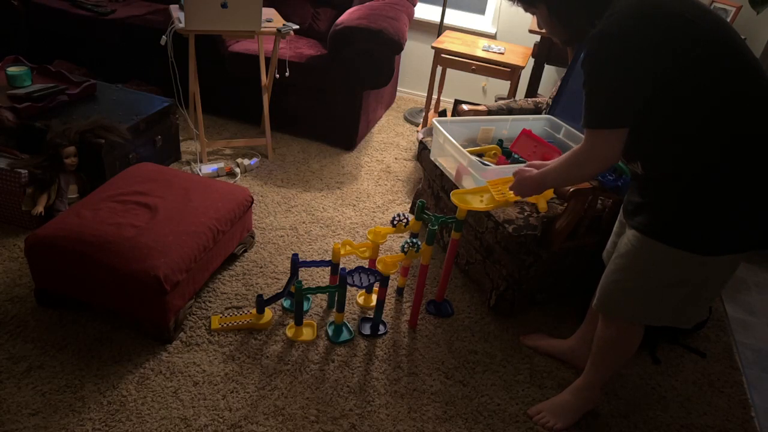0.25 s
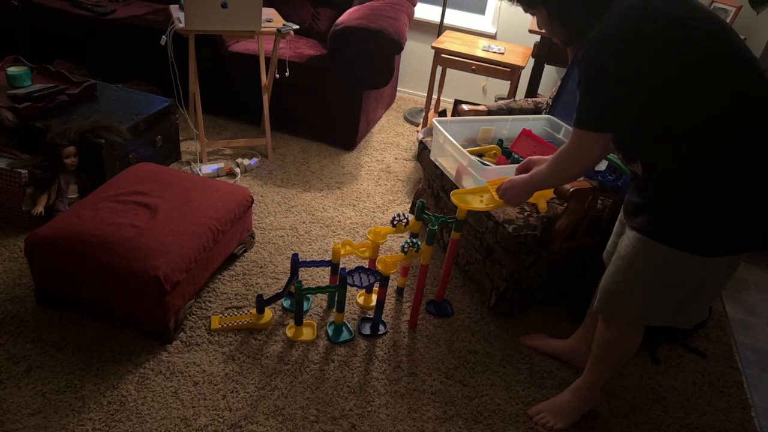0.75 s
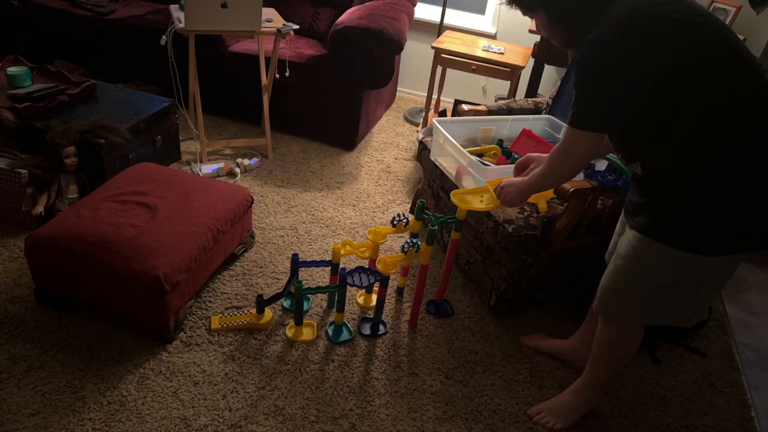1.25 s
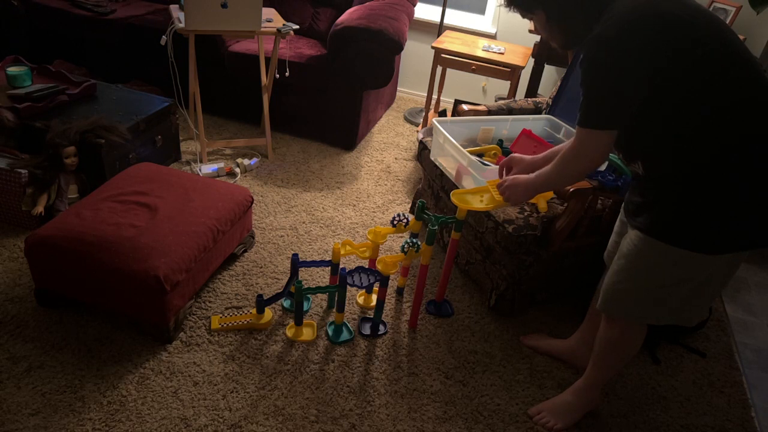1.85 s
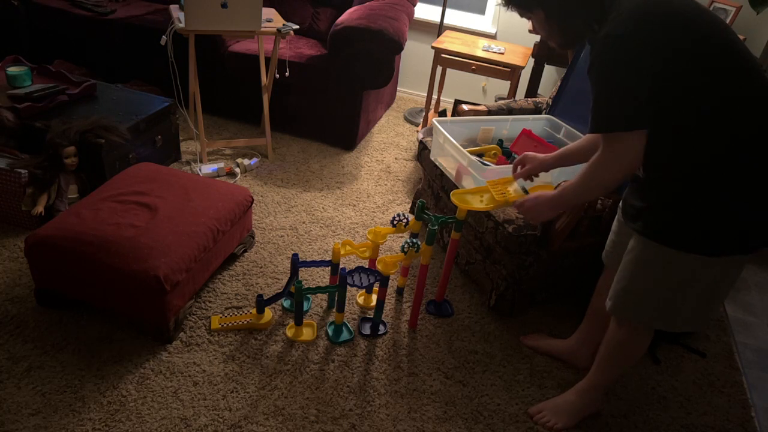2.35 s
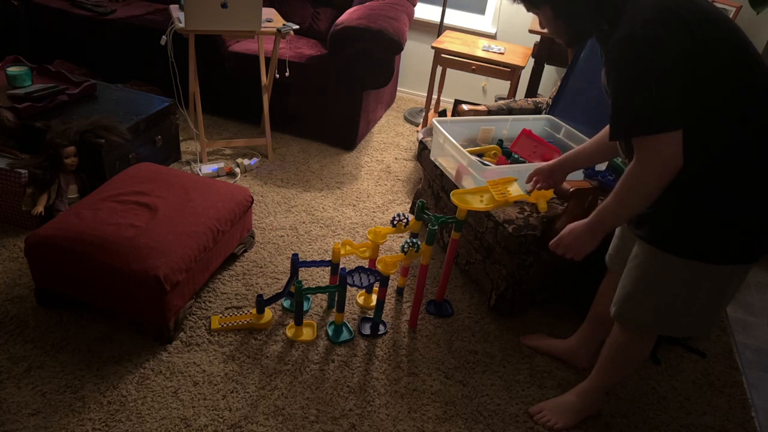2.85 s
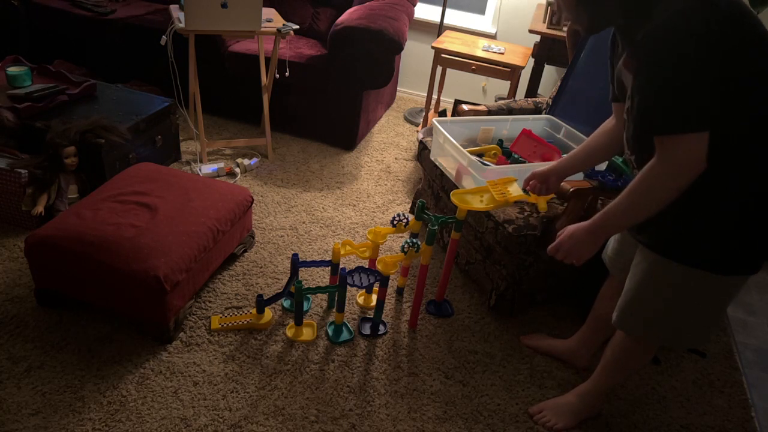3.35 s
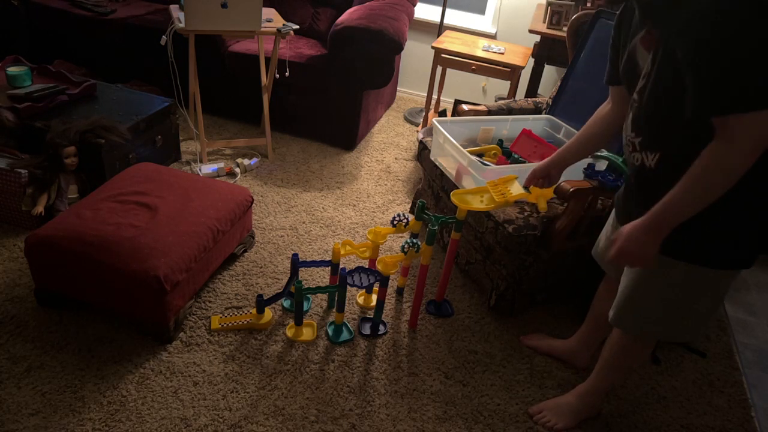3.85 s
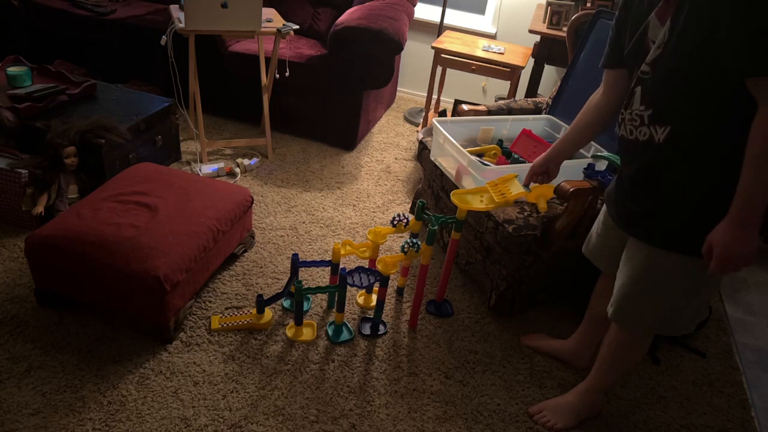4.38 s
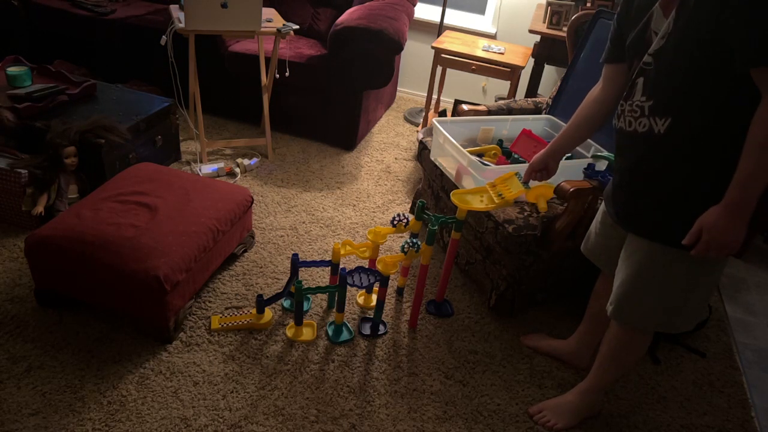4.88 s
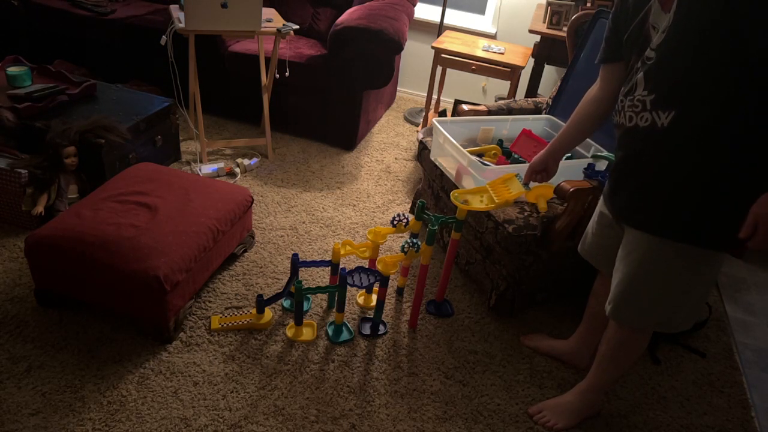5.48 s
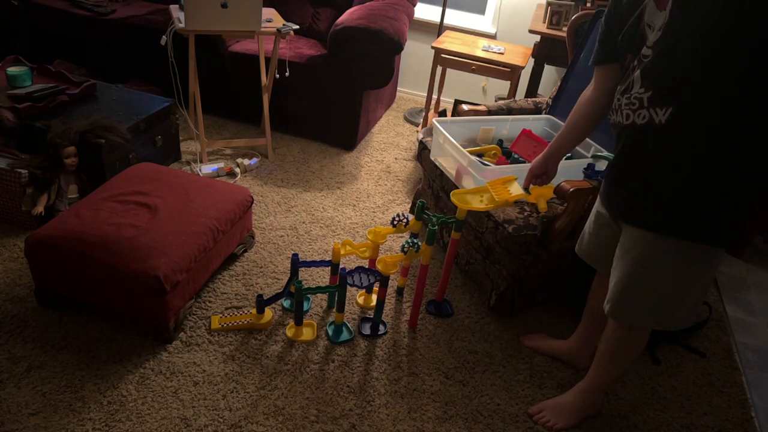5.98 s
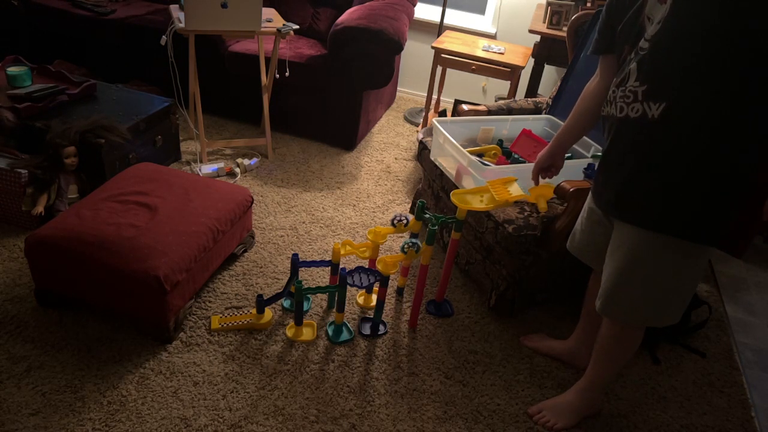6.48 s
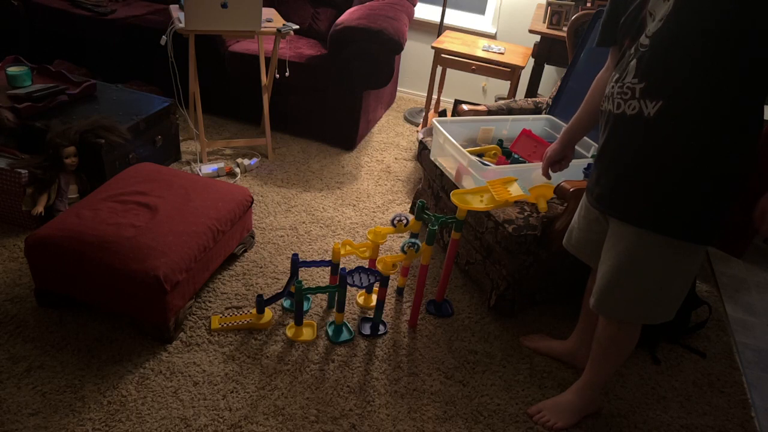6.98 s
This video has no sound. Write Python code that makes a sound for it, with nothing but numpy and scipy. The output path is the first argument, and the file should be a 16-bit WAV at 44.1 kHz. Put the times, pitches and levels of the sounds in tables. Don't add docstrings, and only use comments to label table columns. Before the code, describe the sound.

A quiet carpeted living room with low, wavering appliance hum and faint hiss, heard from a few metres away. From 0 to 0.3 s glass marbles stir softly in a plastic tray; after a pause, small clicks return from 0.9 to 1.5 s. At about 1.7 s one marble starts down the toy track, ticking from piece to piece, with stronger knocks near 2.1, 2.2 and 2.5 s and spaced hits until 3.3 s. From 3.4 s it bounces in quick, fading taps, resting by 4.3 s. A very faint, very high squeak wavers at 4.6-5.0 s. At 5.2 s a handful is released with a loud thump and pours down in a dense, bright, hollow plastic clatter, busiest until 6.1 s. It thins into clumps and stragglers, with ringing cup hits near 6.45 s and a sharp one at 7.13 s. Short room echoes follow every knock.

```python
import sys
import numpy as np
from scipy import signal
from scipy.fft import rfft, irfft
from scipy.io import wavfile
from scipy.ndimage import uniform_filter1d

SR = 44100
rng = np.random.default_rng(int(sys.argv[2]) if len(sys.argv) > 2 else 0)


def unload_audio(sound):
    columns = np.transpose(np.atleast_2d(sound))
    steps = np.round(np.clip(columns, -1, 1) * 32767)
    wavfile.write(sys.argv[1], SR, steps.astype(np.int16))


def voltage_ratio(decibels):
    exponent = np.asarray(decibels, float) / 20
    return 10 ** exponent


N = 318843

TRAY_HZ, TUBE_HZ, CHUTE_HZ, RAMP_HZ, RAIL_HZ = 305, 688, 1387, 1730, 1980
STEP_HZ, WALL_HZ, GATE_HZ, CUP_HZ, TIPPED_CUP_HZ = 2190, 2345, 3130, 4075, 4160
# pitch in Hz, width in Hz, level in dB.
TUBE_MODES = [(693.7, 8.9, -11.5), (840, 120, -10), (982, 58, -0.5)]
# pitch in Hz, width in Hz, level in dB.
UPPER_WALLS = [(1390, 340, -8), (2006, 51, 5), (2340, 44, 10), (2663, 100, 12.5), (3030, 42, 8.5),
               (3400, 14, -31), (4080, 78, 4.5), (4120, 110, -36), (4520, 73, -29)]
# frequency in Hz, level in dB per Hz.
UPPER_BODY = [(600, -37.5), (1050, -7), (1400, -5), (2330, -8), (3490, -5.5), (4150, -7), (5200, -21.5),
              (6760, -47)]
# frequency in Hz, level in dB per Hz.
LOWER_CHUTE_BODY = [(600, -40.5), (1000, -1), (1400, -1), (1800, -1.5), (2400, -3), (3100, -9), (4300, -21),
                    (5200, -46), (6760, -37)]
# frequency in Hz, level in dB per Hz.
CRACK = [(3000, -40), (4800, -5), (6300, -0.5), (8000, -2.5), (10000, -7.5), (11500, -9), (13200, -17.5),
         (14800, -11.5), (16500, -8.5), (19000, -35)]
STAGE_SETTINGS = {"stirs": (0.062, -13, 0.0066), "drops": (0.047, -10, 0.0061),
                  "glances": (0.75, -10, 0.0086), "pour": (0.068, -8, 0.0067),
                  "rattle": (0.14, -11, 0.0052), "piles": (2.9, -11, 0.01)}


def evened(x):
    return x / np.sqrt(np.mean(x ** 2) + 1e-20)


def read(points, hz):
    f, value = np.transpose(points)
    return np.interp(np.log(hz + 1), np.log(f + 1), value)


def add(mix, start_s, sound):
    part = mix[round(start_s * SR):][:len(sound)]
    part += sound[:len(part)]


def coloured(x, points):
    hz = abs(np.fft.fftfreq(2048, 1 / SR))
    log_gain = np.log(voltage_ratio(np.maximum(read(points, hz), -70)))
    taps = np.fft.ifft(np.exp(np.conj(signal.hilbert(log_gain)))).real[:1024]
    return signal.oaconvolve(x, taps / np.linalg.norm(taps))[:len(x)]


def ring(x, hz, width_hz):
    radius = np.exp(-np.pi * width_hz / SR)
    angle = 2 * np.pi * hz / SR
    poles = [1, -2 * radius * np.cos(angle), radius * radius]
    return np.sqrt(1 - radius) * np.sin(angle) * signal.lfilter([0, 1], poles, x)


def swells(rows, rise_db_per_s, fall_db_per_s):
    t = np.arange(N) / SR
    levels_db = []
    for start_s, hold_s, db in rows:
        before_s = np.maximum(start_s - t, 0)
        after_s = np.maximum(t - start_s - hold_s, 0)
        levels_db.append(db - rise_db_per_s * before_s - fall_db_per_s * after_s)
    return np.max(levels_db, axis=0)


def hush():
    # frequency in Hz, level in dB per Hz.
    air_spectrum = [(20, -50), (36, -5.5), (90, -13), (140, -13.5), (175, -7), (205, -15), (260, -7),
                    (400, -14), (780, -21.5), (880, -19.5), (1100, -26), (4000, -37.5), (10200, -49.5),
                    (11800, -42), (16000, -44)]
    # pitch in Hz, wander in Hz, level in dB.
    hum_tones = [(36.4, 4.2, -86), (88.3, 1.67, -63.5), (119, 1.6, -67), (167.6, 3.82, -66),
                 (880, 4.4, -75)]
    hz = np.fft.rfftfreq(N, 1 / SR)
    air = evened(irfft(rfft(rng.standard_normal(N)) * voltage_ratio(read(air_spectrum, hz)), N))
    drifts = evened(uniform_filter1d(rng.standard_normal((len(hum_tones), N)), 6000, axis=1))
    hum = np.zeros(N)
    for (tone_hz, wander_hz, db), drift in zip(hum_tones, drifts):
        phase = 2 * np.pi * np.cumsum(tone_hz + wander_hz * drift) / SR
        hum += voltage_ratio(db + 4.0) * np.sin(phase)
    return voltage_ratio(-58) * air + hum


def room(x):
    # frequency in Hz, t60 in seconds.
    decay = [(250, 0.35), (1000, 0.47), (2800, 0.26), (7000, 0.28), (15000, 0.28)]
    t, out = np.arange(N) / SR, np.zeros(N)
    for k in range(3):
        taps = rng.standard_normal(SR // 2) * (rng.random(SR // 2) < 0.15)
        hz, when_s, z = signal.stft(taps, SR, nperseg=128)
        fade = voltage_ratio(-60 * when_s / read(decay, hz)[:, None])
        tail = signal.istft(z * fade, SR, nperseg=128)[1]
        tail *= np.clip(np.arange(len(tail)) / SR / 0.0015 - 0.4, 0, 1)
        share = np.cos(2 * np.pi * (1.3 * t + k / 3)) * np.sqrt(2 / 3)
        out += signal.fftconvolve(x * share, tail / np.linalg.norm(tail))[:N]
    return out


def squeak():
    # time in seconds, pitch in Hz.
    pitch_track = [(4.635, 11100), (4.69, 12400), (4.72, 12200), (4.755, 11750), (4.8, 12250),
                   (4.85, 11700), (4.885, 12500), (4.955, 10300), (5.0, 10100)]
    level_db, flutter_db, partial_ratio, partial_db = -78, 3.5, 1.25, -7
    s, hz = np.transpose(pitch_track)
    t, out = np.arange(s[0], s[-1], 1 / SR), np.zeros(N)
    phase = 2 * np.pi * np.cumsum(np.interp(t, s, hz)) / SR
    flutter = evened(uniform_filter1d(rng.standard_normal(len(t)), size=900))
    tone = np.sin(phase) + voltage_ratio(partial_db) * np.sin(partial_ratio * phase)
    add(out, s[0], voltage_ratio(level_db + flutter_db * flutter) * signal.windows.tukey(len(t), 0.3) * tone)
    return out


def tray_and_cup():
    # start in seconds, level in dB, pitch in Hz, t60 in seconds.
    thumps = [(1.924, -40, RAMP_HZ, 0.066), (2.09, -38, TRAY_HZ, 0.068), (2.092, -36, RAMP_HZ, .08),
              (3.297, -35, RAMP_HZ, 0.066), (4.968, -61, 2610, .06), (4.993, -60, 2610, .1),
              (5.216, -23.5, TRAY_HZ, 0.16), (5.216, -37.5, 474, 0.15), (5.23, -35, TUBE_HZ, 0.36),
              (5.224, -22.5, CHUTE_HZ, 0.21), (5.499, -31.5, CHUTE_HZ, 0.28), (5.594, -16, 2590, 0.05),
              (5.6, -46, TUBE_HZ, 0.57), (5.7, -19.5, WALL_HZ, 0.16), (5.759, -23.5, CHUTE_HZ, 0.25),
              (5.78, -35, TUBE_HZ, 0.4), (5.803, -22.5, RAIL_HZ, 0.18), (5.84, -28, RAIL_HZ, 0.31),
              (5.849, -38, CHUTE_HZ, 0.18), (5.98, -29.5, TUBE_HZ, 0.21), (6.014, -25, CHUTE_HZ, 0.077),
              (6.056, -20.5, WALL_HZ, 0.056), (7.137, -9, STEP_HZ, 0.024)]
    # start in seconds, level in dB, pitch in Hz, t60 in seconds, overtone in dB.
    cup_rings = [
        (6.406, -24, CUP_HZ, 0.04, -35),
        (6.451, -26, TIPPED_CUP_HZ, 0.26, -20),
        (6.529, -32, CUP_HZ, 0.11, -28),
        (7.142, -9, CUP_HZ, 0.025, -14),
        (7.154, -28, CUP_HZ, 0.1, -14),
    ]
    out, t = np.zeros(N), np.arange(SR // 2) / SR
    for start_s, db, hz, t60_s in thumps:
        onset = np.minimum(t * hz / 4.0, 1)
        add(out, start_s, voltage_ratio(db - 60 * t / t60_s) * np.sin(2 * np.pi * hz * t) * onset)
    for start_s, db, hz, t60_s, over_db in cup_rings:
        phase = 2 * np.pi * hz * (t - 0.134 * t ** 2)
        tone = np.sin(phase) + voltage_ratio(over_db) * np.sin(1.92 * phase)
        add(out, start_s, voltage_ratio(db + 2 - 60 * t / t60_s) * np.minimum(t / 0.00094, 1) * tone)
    return out


def jostle(body, level_db, hollow_db, crack_db, bumps_per_s):
    size_db = 6 * np.minimum(rng.exponential(1, N), 2.5)
    hits = (rng.random(N) < bumps_per_s / SR) * rng.choice([-1, 1], N)
    bumps = evened(voltage_ratio(size_db) * hits) * voltage_ratio(level_db)
    which = rng.integers(0, len(UPPER_WALLS), N)
    bump_rms = np.sqrt(np.mean(bumps ** 2))
    walls, hollow = np.zeros(N), np.zeros(N)
    for k, (hz, width_hz, db) in enumerate(UPPER_WALLS):
        walls += voltage_ratio(db) * ring(bumps * (which == k), hz, 4.8 * width_hz)
    for hz, width_hz, db in TUBE_MODES:
        hollow += voltage_ratio(db) * ring(bumps * voltage_ratio(hollow_db), hz, width_hz)
    dull = 0.7 * coloured(bumps, body)
    crack = coloured(bumps * voltage_ratio(crack_db), CRACK)
    return bump_rms * 0.94 * evened(walls) + dull + hollow + crack


def rolling():
    # start in seconds, hold in seconds, level in dB.
    surges = [
        (5.25, 0.037, -29),
        (5.5, 0.1, -23.5),
        (5.75, 0.014, -19),
        (6.0, 0.043, -19.5),
        (6.42, 0.039, -26.5),
        (6.65, 0.018, -26.5),
        (6.9, 0.038, -28.5),
        (7.2, 0.028, -25.5),
    ]
    # start in seconds, hold in seconds, level in dB.
    glides = [
        (0.0, 0.039, -33),
        (1.35, 0.27, -45),
        (2.26, 0.014, -28.5),
        (2.82, 0.21, -41),
        (3.72, 0.041, -54),
    ]
    crowd_db = swells(surges, rise_db_per_s=261, fall_db_per_s=81) - 11.5
    lone_db = swells(glides, rise_db_per_s=150, fall_db_per_s=93) - 31.5
    crowd = jostle(UPPER_BODY, crowd_db, hollow_db=-14, crack_db=-11, bumps_per_s=440)
    return crowd + jostle(LOWER_CHUTE_BODY, lone_db, hollow_db=-26, crack_db=-17, bumps_per_s=1300)


def buzz(t, rise):
    spectrum = rfft(rng.standard_normal(len(t)) * np.exp(-t) * (1 - np.exp(-t / rise)))
    return irfft(spectrum / abs(spectrum), len(t)) * np.exp(-0.4 * t)


def struck(x, modes, widen):
    out = np.zeros(len(x))
    for hz, width_hz, db in modes:
        share, detune = rng.standard_normal(2)
        out += voltage_ratio(db + 4 * share) * ring(x, hz * (1 + 0.012 * detune), width_hz * widen)
    return out


def knock(body, modes, rise, db, hz, hollow_db, crack_db, chatter_s):
    t = np.arange(4096) / SR / np.clip(chatter_s, 0.001, 0.04)
    blows = buzz(t, rise)
    walls = 0.59 * evened(struck(blows, modes, 0.82))
    piece = 0.56 * evened(ring(blows, hz, 69))
    dull = 1.14 * evened(coloured(blows, body))
    hollow = evened(struck(blows, TUBE_MODES, 1.84))
    crack = evened(coloured(blows * np.exp(-0.6 * t), CRACK))
    layers = evened(walls + piece + dull) + voltage_ratio(hollow_db - 4.0) * hollow + voltage_ratio(crack_db) * crack
    return voltage_ratio(db - 21.5) * np.sqrt(chatter_s / 0.0072) * layers


def knocks(body, modes, stage, rows):
    out = np.zeros(N)
    rise, hollow_db, chatter_s = STAGE_SETTINGS[stage]
    for start_s, db, hz, crack_db in rows:
        add(out, start_s, knock(body, modes, rise, db, hz, hollow_db, crack_db, chatter_s))
    return out


def cracked(rows):
    return [(start_s, db, hz, -12.5 + 0.62 * (db + 20)) for start_s, db, hz in rows]


def lone_marble():
    # pitch in Hz, width in Hz, level in dB.
    lower_walls = [(990, 21, -10), (1114, 14, 2), (1278, 30, 12), (1365, 16, 4), (1452, 23, 13),
                   (1590, 25, -7), (1730, 37, 15.5), (1956, 16, 13), (2177, 30, 4), (2410, 40, 3),
                   (2620, 49, 6.5), (2970, 20, 6), (3300, 26, -21), (4080, 49, -31)]
    # start in seconds, peak in dB, ring of the struck piece in Hz, crack in dB.
    stirs = [(0.0116, -48, 1680, -18), (0.0366, -40.5, 1910, -28), (0.059, -54, 2000, -26),
             (0.1426, -43, 1750, -24), (0.218, -47, 1730, -29), (0.2887, -48.5, 1730, -26),
             (0.8843, -49.5, 1600, -10), (0.98, -52, 1410, -16.5), (1.047, -54, 1770, -20),
             (1.089, -59, 3100, -5), (1.1698, -53.5, 1730, -7), (1.265, -43, 2620, -24),
             (1.3077, -51, 1400, -16), (1.3335, -34, 2900, -20.5), (1.4064, -42.5, 1600, -23),
             (1.498, -45.5, 2950, -24), (1.5455, -37.5, 3020, -13.5), (4.9702, -55, 2570, -19),
             (4.993, -52, 2550, -12)]
    # start in seconds, peak in dB, ring in Hz.
    drops = [(1.6669, -32.5, RAIL_HZ), (1.7514, -32, RAMP_HZ), (1.8417, -31.5, CHUTE_HZ),
             (1.9679, -24.5, 2560), (2.0512, -36, CHUTE_HZ), (2.089, -19, GATE_HZ), (2.175, -36, CHUTE_HZ),
             (2.4513, -22.5, RAMP_HZ), (2.8594, -25.5, RAIL_HZ), (3.1632, -27, RAIL_HZ),
             (3.235, -46, CHUTE_HZ), (3.3987, -29.5, STEP_HZ), (3.4835, -32.5, STEP_HZ),
             (3.5607, -32.5, RAMP_HZ), (3.6391, -34.5, RAMP_HZ), (3.707, -37, RAMP_HZ),
             (3.7577, -38.5, 1630), (3.813, -41, RAMP_HZ), (3.8462, -47, 1670), (3.9037, -41.5, RAMP_HZ),
             (3.9713, -49.5, 1600), (4.0307, -43.5, RAMP_HZ), (4.103, -52, 1600), (4.1789, -49.5, WALL_HZ),
             (4.2798, -48.5, RAMP_HZ), (4.329, -59, WALL_HZ)]
    # start in seconds, peak in dB, ring in Hz.
    glances = [
        (1.9204, -37, RAMP_HZ),
        (2.2147, -23.5, 1560),
        (2.678, -27.5, RAIL_HZ),
        (3.022, -29, STEP_HZ),
        (3.2941, -29.5, RAMP_HZ),
    ]
    out = knocks(LOWER_CHUTE_BODY, lower_walls, "stirs", stirs)
    out += knocks(LOWER_CHUTE_BODY, lower_walls, "drops", cracked(drops))
    return out + knocks(LOWER_CHUTE_BODY, lower_walls, "glances", cracked(glances))


def handful():
    # start in seconds, peak in dB, ring in Hz, crack in dB.
    pour = [(5.132, -34.5, 4070, -7), (5.2133, -5.5, 2520, -13), (5.239, -7, 2770, -8),
            (5.2544, -11.5, 1420, -18), (5.2883, -10.5, 2360, -10.5), (5.314, -14, 1430, -7.5),
            (5.4321, -20, 1420, -3), (5.4676, -22.5, 2480, -4.5), (5.4859, -13, 2850, -7),
            (5.5116, -19.5, 2400, -6.5), (5.5353, -13.5, 3030, -13), (5.5649, -18, 1390, -6),
            (5.5942, -15.5, 2570, -8.5), (5.6297, -14, 2430, -11), (5.6805, -12, 2480, -10.5),
            (5.7209, -9.5, 2450, -11), (5.7395, -13, 1840, -9.5), (5.7632, -11.5, 2340, -8.5),
            (5.7832, -17.5, 2340, -8.5), (5.8344, -9.5, 3030, -12.5), (5.86, -21.5, 1980, -8),
            (5.894, -16, 2100, -15), (5.9256, -9.5, 2880, -9.5), (5.9546, -27, 1390, 3),
            (5.9773, -12, 3030, -11), (6.1206, -15, 2340, -12), (6.149, -26, 1900, -24)]
    # start in seconds, peak in dB, ring in Hz, crack in dB.
    rattle = [(6.2158, -19, 1850, -12), (6.2467, -24.5, 1940, -15), (6.2839, -29, 1350, -3),
              (6.349, -32, 1980, -26), (6.3891, -18, 1880, -12.5), (6.4003, -10.5, 2340, -13),
              (6.419, -24.5, 2340, -6), (6.4977, -14.5, 2340, -15.5), (6.5282, -15.5, 3900, -34),
              (6.6155, -11.5, 2170, -8.5), (6.6342, -14.5, 2110, -19), (6.6575, -25, 2160, -15),
              (6.6864, -31, 1660, -16), (6.7413, -17.5, 2160, -28), (6.7611, -21, 2180, -13.5),
              (6.8842, -13, 2340, -11), (6.918, -16.5, 2340, -16), (6.9392, -18.5, 2020, -8),
              (7.006, -21.5, 1830, -30), (7.0392, -22.5, 2500, -30), (7.0919, -17, 1690, -14.5),
              (7.1131, -15.5, 2340, -18), (7.1762, -29, 4030, -17), (7.2002, -19.5, 2380, -8.5)]
    # start in seconds, peak in dB, ring in Hz, crack in dB.
    piles = [
        (5.146, -29, 2480, -7),
        (5.2246, -9.5, 2350, -12.5),
        (6.0076, -13.5, 1425, -13),
        (6.0522, -15.5, 2350, -11),
        (6.0944, -21.5, 1790, -10),
        (6.19, -12.5, 1720, -11.5),
        (6.4469, -11, 4080, -13.5),
        (6.8278, -14, 2340, -16),
        (7.129, -12.5, 4080, -6.5),
    ]
    out = knocks(UPPER_BODY, UPPER_WALLS, "pour", pour)
    out += knocks(UPPER_BODY, UPPER_WALLS, "rattle", rattle)
    return out + knocks(UPPER_BODY, UPPER_WALLS, "piles", piles)


def scene():
    blows = rolling() + lone_marble() + handful()
    high_pass = signal.butter(7, 608, "high", fs=SR, output="sos")
    base_hz, base_width_hz, base_db = 344, 204, -64
    base = evened(ring(ring(blows, base_hz, base_width_hz), base_hz, base_width_hz))
    track = signal.sosfilt(high_pass, blows) + voltage_ratio(base_db) * base + tray_and_cup()
    return (track + voltage_ratio(2.5) * room(track) + squeak() + hush())[None]


def roll_off(x):
    return signal.sosfilt(signal.butter(12, 16800, fs=SR, output="sos"), x)


def record(dry):
    edge_hz, spill_db = 15550, -36
    low_pass = signal.firwin(401, edge_hz, window=("kaiser", 8), fs=SR)
    kept = signal.oaconvolve(dry, low_pass[None], "same")
    return roll_off(kept + voltage_ratio(spill_db) * (dry - kept))


dry = scene()
out = record(dry)
unload_audio(out)
```